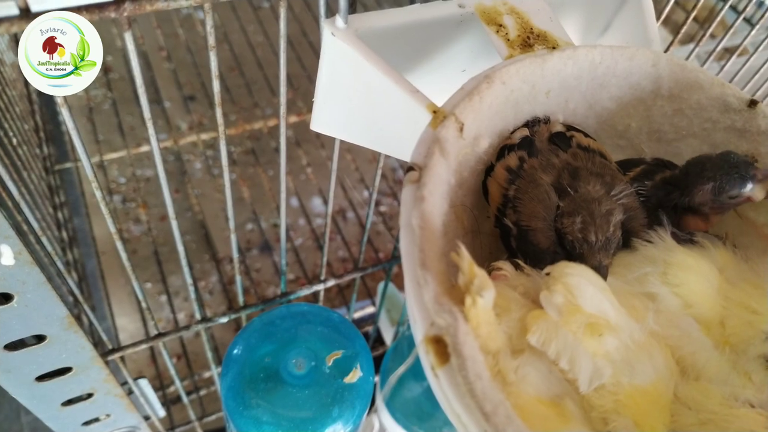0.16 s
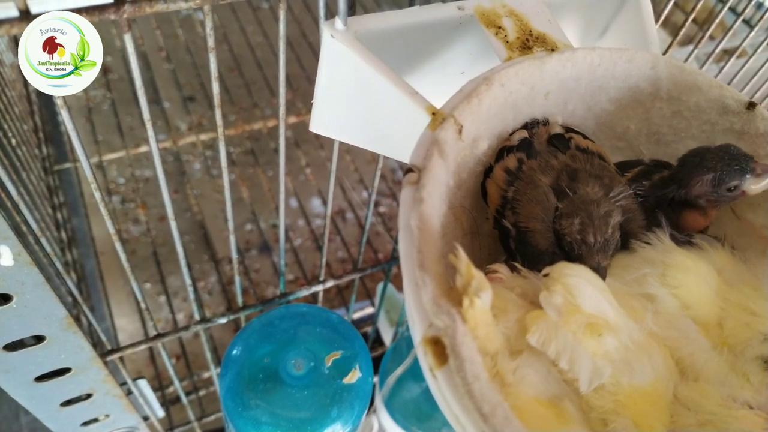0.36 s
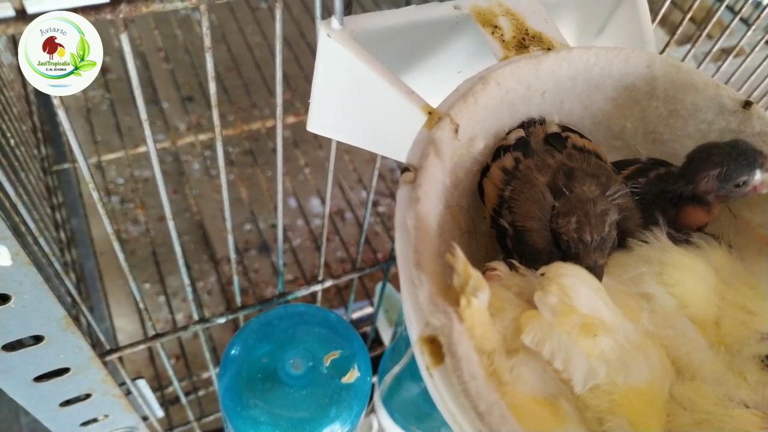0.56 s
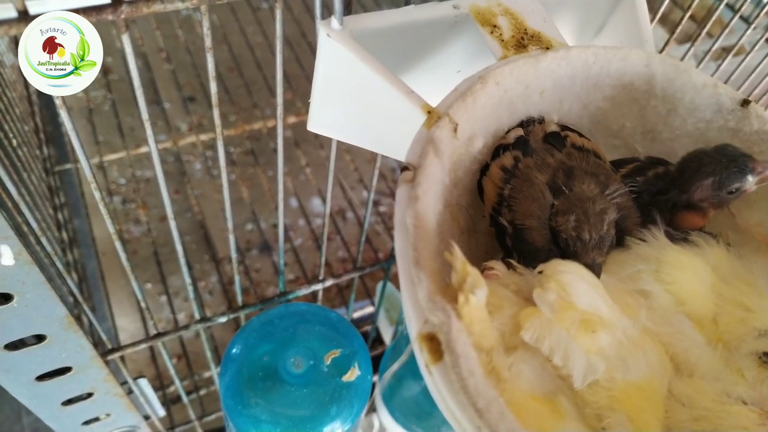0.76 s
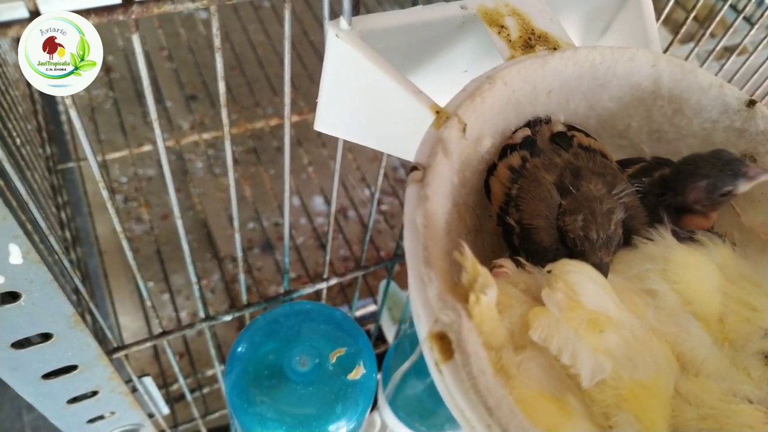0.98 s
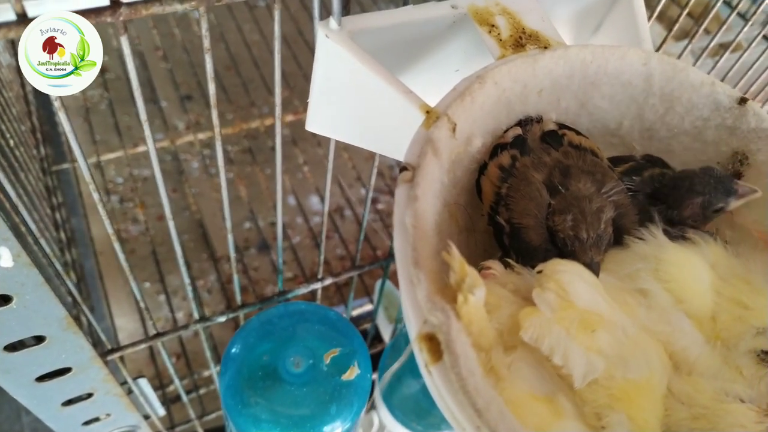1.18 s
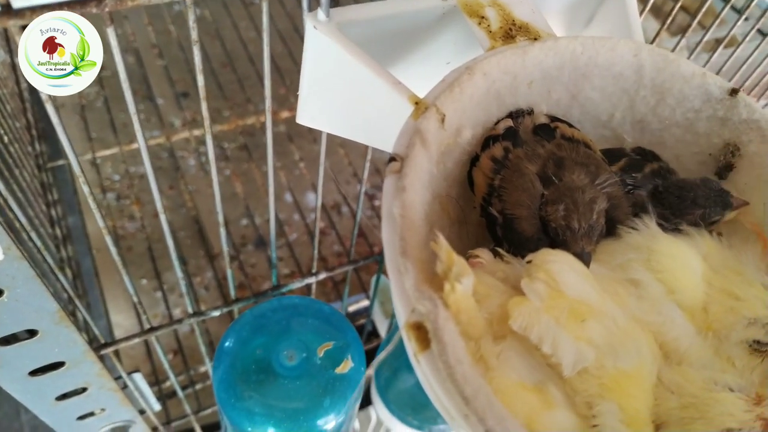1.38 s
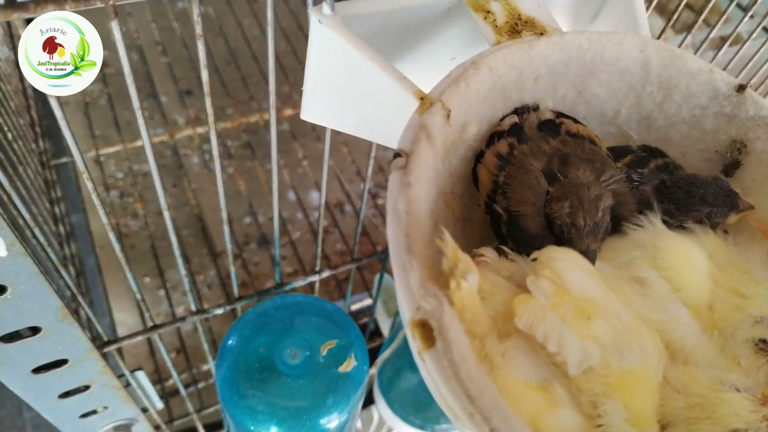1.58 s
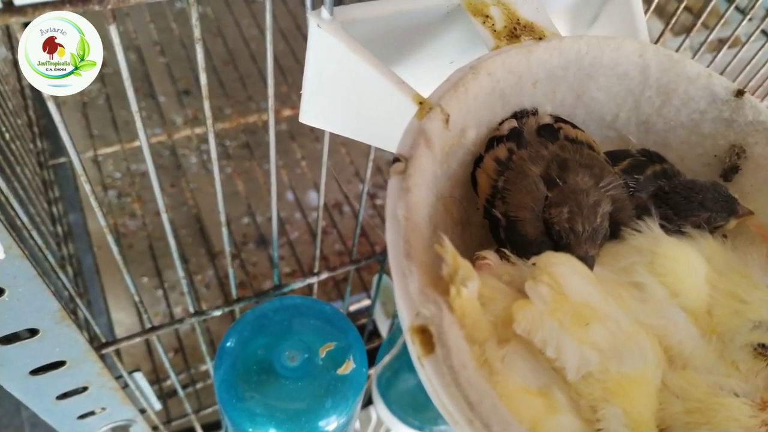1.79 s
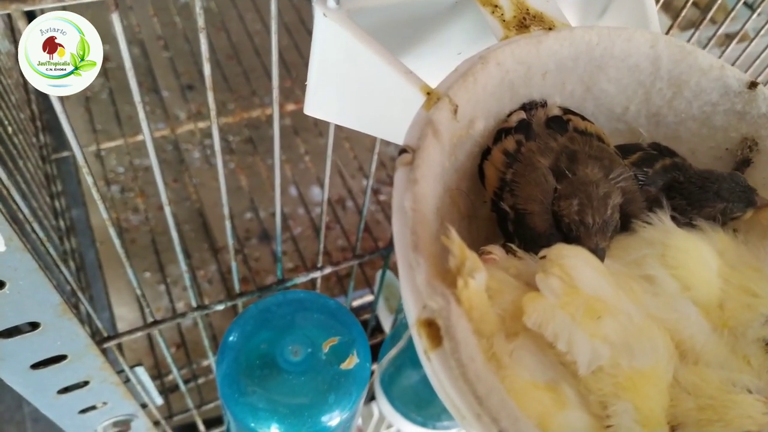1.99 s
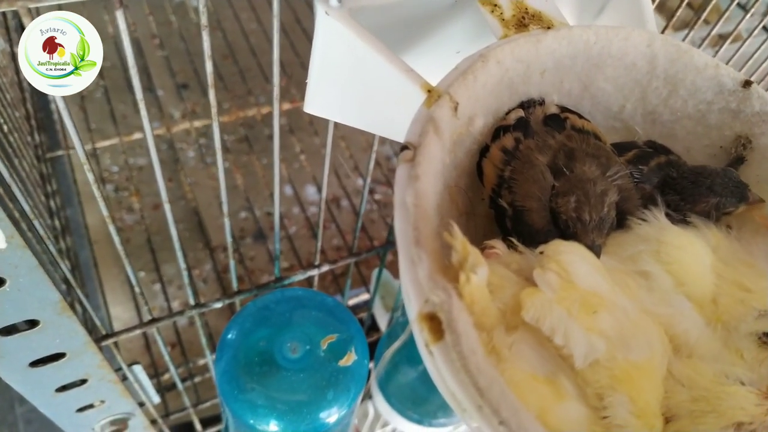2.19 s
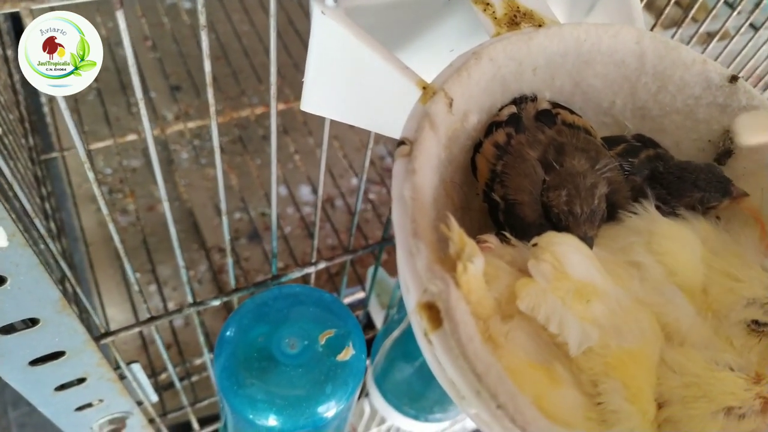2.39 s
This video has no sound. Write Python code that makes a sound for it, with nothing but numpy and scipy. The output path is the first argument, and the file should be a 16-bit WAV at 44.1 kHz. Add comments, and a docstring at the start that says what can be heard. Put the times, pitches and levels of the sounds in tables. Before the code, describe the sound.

Baby birds cheep and whistle in short runs, with soft feather rustling indoors.

```python
"""Nestling birds beg from a nest cup inside a wire cage, in a hard, echoing room.
Two runs of gliding, overlapping whistles each end in a sharp cheep; hoarse calls lie between
and faint chips follow. The syrinx whistles and rattles, and air hisses through open beaks.
Feathers rustle and a beak or claw ticks over a low room rumble; the loudest peaks just clip."""
import sys
import numpy as np
from scipy import signal
from scipy.fft import rfft, irfft
from scipy.io import wavfile
from scipy.ndimage import uniform_filter1d

SR = 44100
rng = np.random.default_rng(int(sys.argv[2]) if len(sys.argv) > 2 else 0)


def dump(signal):
    """Clip the signal to [-1, 1] and save it as 16-bit WAV at the path in sys.argv[1]."""
    limited = np.clip(np.atleast_2d(signal).T, -1, 1)
    pcm = np.round(limited * 32767).astype(np.int16)
    wavfile.write(sys.argv[1], SR, pcm)


N = 108045


def amp(db):
    """Decibels to gain."""
    return 10 ** (np.asarray(db) / 20)


def unit(x):
    """Scales to rms 1."""
    return x / np.sqrt(np.mean(x ** 2) + 1e-20)


def curve(points, hz):
    """Reads a table on a log-frequency axis."""
    f, value = np.transpose(points)
    return np.interp(np.log(hz + 1), np.log(f + 1), value)


def add(mix, start, sound):
    """Mixes a sound in at a start time in seconds."""
    part = mix[max(round(start * SR), 0):][:len(sound)]
    part += sound[:len(part)]


def noise(size, colour):
    """Noise of rms about 1, shaped by the gain colour(hz)."""
    n = 16384 * (1 + size // 16384)
    spectrum = rfft(rng.standard_normal(n)) * colour(np.fft.rfftfreq(n, 1 / SR))
    return unit(irfft(spectrum, n))[:size]


def wobble(size, hz):
    """Smooth random modulation, rolling off above hz."""
    return noise(size, lambda f: np.exp(-.5 * (f / hz) ** 2))


# Room tone EQ: f/Hz, level/dB
ROOM_TONE_EQ = [(15, -4.5), (36, 2), (48, -5.5), (75, -12), (330, -16.5), (700, -24), (1400, -27),
                (4000, -30.5), (8500, -21.5), (14000, -37)]
# Room tone stereo image: f/Hz, left-right correlation/0-1
ROOM_TONE_IMAGE = [(100, .97), (350, 0.95), (1000, 0)]


def room_tone():
    """Low room rumble, nearly mono, under a thin wide hiss."""
    hz = np.fft.rfftfreq(4096, 1 / SR)
    a, b, c, d, patches = rng.standard_normal((N // 1024 + 6, len(hz), 5)).T
    shared = curve(ROOM_TONE_IMAGE, hz)[:, None]
    left = a + 1j * b
    right = shared * left + np.sqrt(1 - shared ** 2) * (c + 1j * d)
    patches = uniform_filter1d(uniform_filter1d(patches, size=30, axis=0), size=5, axis=1)
    eq = amp(curve(ROOM_TONE_EQ, hz)[:, None] + 0.5 * unit(patches))
    bed = signal.istft(np.array([left, right]) * eq, nperseg=4096, noverlap=3072)[1]
    return amp(-37.5) * unit(bed[:, :N])


# Reverb decay: f/Hz, t60/s
REVERB_DECAY = [(2500, 0.48), (6500, 0.4), (14000, 0.28)]


def reverb(x, direct_db=-6, tail_db=-3.5, early_s=0.012):
    """Direct sound, quick reflections off cup and cage, and the room's tail, different on each side."""
    t = np.arange(SR) / SR
    channels = []
    for side in range(2):
        early = rng.standard_normal(SR) * (rng.random(SR) < 1500 / SR) * np.exp(-t / early_s)
        hz, age, spectra = signal.stft(rng.standard_normal(SR), SR, nperseg=256)
        decay = amp(-60 * age / curve(REVERB_DECAY, hz)[:, None])
        tail = signal.istft(spectra * decay, SR, nperseg=256)[1][:SR] * np.minimum(t / early_s, 1)
        impulse = early / np.linalg.norm(early) + amp(tail_db) * tail / np.linalg.norm(tail)
        impulse[side] += amp(direct_db)
        response = rfft(impulse)
        colour = np.sqrt(uniform_filter1d(abs(response) ** 2, size=250))
        neutral = irfft(response / colour)[:SR // 2]
        channels.append(np.linalg.norm(impulse) * signal.fftconvolve(x, neutral)[:N])
    return np.array(channels)


# Feather and nest fibre EQ: f/Hz, level/dB
FEATHER_EQ = [(200, -11), (1100, -3.5), (2300, -0.5), (5500, -2.5), (8500, 12), (11000, 0.5), (14000, -1.5)]


def feather_colour(hz):
    """The dry, bright tone of rubbing feathers, as a gain."""
    return amp(curve(FEATHER_EQ, hz))


# Soft stirring with a lull between: start t/s, end t/s, level/dB
STIR_CUES = [(0, 1.75, -35), (1.9, 2.45, -36)]
GRAIN_DB = 2.5


def stirring(nest):
    """Bodies shift in the nest lining: a soft, uneven crackle of fibres."""
    for start, end, db in STIR_CUES:
        n = round((end - start) * SR)
        swell_db = 8 * wobble(n, hz=4)
        envelope = unit(amp(swell_db + GRAIN_DB * wobble(n, hz=400)))
        add(nest, start, amp(db) * envelope * noise(n, feather_colour))


def burst(length, db, colour, attack_s=0.0027, release_s=0.0049):
    """Grainy noise that rises, holds and dies away."""
    t = np.arange(0, length + 5 * release_s, 1 / SR)
    envelope = np.minimum(t / attack_s, 1) * np.exp(-np.maximum(t - length, 0) / release_s)
    return amp(db) * envelope * noise(len(t), colour) * unit(amp(GRAIN_DB * wobble(len(t), hz=305)))


# Rustle accents: t/s, length/s, level/dB
RUSTLE_CUES = [(1.435, 0.12, -30), (1.483, 0.021, -24), (1.661, 0.054, -28.5), (2.109, 0.02, -26),
               (2.222, 0.037, -27.5), (2.365, 0.014, -25.5)]


def rustles(nest):
    """Feathers and nest fibres rub in short bursts."""
    for start, length, db in RUSTLE_CUES:
        add(nest, start, burst(length, db, feather_colour))


# Beak and claw ticks: t/s, level/dB, f/Hz, ring/s, reverb send/gain
TICK_CUES = [(1.295, -30, 1800, 0.00048, 0.21), (2.2756, -10, 6300, 0.00017, 0.29)]


def ticks(nest, close):
    """Tiny hard contacts with a short ring, close and nearly dry."""
    for start, db, hz, ring_s, send in TICK_CUES:
        t = np.arange(0, 10 * ring_s, 1 / SR)
        tick = amp(db) * t / ring_s * np.exp(1 - t / ring_s) * np.sin(2 * np.pi * hz * t)
        add(close, start, tick)
        add(nest, start, send * tick)


# Voiceless calls: t/s, length/s, level/dB, centre f/Hz, half width/octaves
HISS_CUES = [(0.048, 0.027, -28.5, 8040, 0.62), (0.172, 0.1, -30.5, 8860, 0.11),
             (0.549, 0.16, -26.5, 6100, 0.77), (0.737, 0.078, -17.5, 7300, 0.8),
             (0.823, 0.15, -29.5, 7600, 1), (0.931, 0.083, -26.5, 8750, 0.1),
             (1.858, 0.038, -26.5, 6440, 0.4), (2.02, 0.0098, -25.5, 7300, 0.4),
             (2.148, 0.046, -27.5, 7200, 0.75)]
LOW_CUT_HZ = 2020  # the small throat passes little below this


def hisses(nest):
    """Air through an open beak: one broad resonance, nothing below the voice."""
    for start, length, db, centre_hz, octaves in HISS_CUES:
        def beak(f):
            resonance = 1 / (1 + (np.log2((f + 1) / centre_hz) / octaves) ** 2)
            return resonance / (1 + (LOW_CUT_HZ / (f + 1)) ** 20) / (1 + (f / 11500) ** 10)
        add(nest, start, burst(length, db, beak))


# Throat and open beak EQ, applied on top of each whistle's level: f/Hz, level/dB
THROAT_EQ = [(2200, -9), (3500, -8), (5000, -4.5), (7400, -2.5), (8800, -2.5), (11000, -11), (12500, -14.5)]
JITTER_HZ, JITTER_DEPTH, FLUTTER_DEPTH = 505, 0.0636, 0.4  # random pitch and level at full roughness
RATTLE_HZ, RATTLE_VIBRATO, RATTLE_TREMOLO = 135.6, 0.095, 0.33  # the pulse of a hoarse call


def whistle(rough, overtones_db, glide, fade_s=0.0017):
    """One side of the syrinx whistles a jittering glide that rattles when hoarse; the throat colours it."""
    times, pitches, levels = np.transpose(glide)
    t = np.arange(times[0], times[-1] + fade_s, 1 / SR)
    n, hoarse = len(t), rough ** 2
    hz, level = np.interp(t, times, pitches), np.interp(t, times, levels)
    rattle = 2 * np.pi * np.cumsum(RATTLE_HZ * (1 + 0.253 * wobble(n, hz=59.3))) / SR
    jitter = JITTER_DEPTH * rough * wobble(n, JITTER_HZ)
    vibrato = RATTLE_VIBRATO * hoarse * np.sin(rattle)
    phase = 2 * np.pi * np.cumsum(hz * (1 + jitter + vibrato)) / SR
    tone = 0
    for k, db in enumerate([0, *overtones_db], 1):
        rasp = hoarse * (wobble(n, hz=1000) + 1j * wobble(n, hz=1000))
        # Air fringes even a clear whistle, more so on the overtones.
        breath = amp(-19 if k == 1 else -13) * (wobble(n, hz=520) + 1j * wobble(n, hz=520))
        tilt_db = 0.085 * (k - 3) * (level - level.max())  # duller as the effort slackens
        gain = amp(db + curve(THROAT_EQ, k * hz) + tilt_db)
        tone = tone + gain * ((1 + rasp + breath) * np.exp(1j * k * phase)).real
    gate = np.clip(np.minimum(t - t[0], t[-1] - t) / fade_s, 0, 1)
    flutter = FLUTTER_DEPTH * rough * wobble(n, JITTER_HZ)
    tremolo = RATTLE_TREMOLO * hoarse * np.cos(rattle)
    envelope = gate * unit(np.exp(flutter + tremolo)) * amp(level)
    low_cut = signal.butter(10, LOW_CUT_HZ, "high", fs=SR, output="sos")
    return signal.sosfilt(low_cut, np.sqrt(2) * tone * envelope)


# Short peeps: t/s, length/s, f/Hz, level/dB, roughness/0-1
PEEP_CUES = [(0, 0.0087, 7060, -16.5, 0), (0.084, 0.011, 7280, -12.5, 0.14), (0.148, 0.024, 6630, -28, 0.3),
             (0.993, 0.023, 5360, -18, 0.5), (1.857, 0.064, 5524, -22, 0.37), (2.027, 0.1, 5360, -21, 0.33),
             (2.027, 0.047, 7790, -18, 0.28), (2.152, 0.06, 6820, -15, 0.22),
             (2.152, 0.09, 4890, -28.5, 0.42)]


def peeps(nest, attack_s=0.0045, edge_db=-18, sag=0.018):
    """Brief whistles that swell and fade while their pitch sags a little."""
    for start, length, hz, db, rough in PEEP_CUES:
        glide = [(start, hz * (1 + sag), db + edge_db),
                 (start + min(attack_s, length / 2), hz, db),
                 (start + length, hz * (1 - sag / 2), db + edge_db)]
        add(nest, start, whistle(rough, [], glide))


# Begging calls: roughness/0-1, [level/dB of harmonics 2, 3...], glide [(t/s, f/Hz, level/dB)...]
BEGGING_CUES = [ (0.26, [-14.5], [(.148, 1910, -31), (.19, 2510, -15), (.25, 3040, -32)]), (0.094, [-8.5],
                [(.188, 4965, -48), (.208, 5536, -6), (.228, 5840, -29)]), (0.14, [7.8, -0.81],
                [(.252, 3202, -32), (.266, 3313, -13), (.28, 3423, -17.5), (.308, 3407, -29)]),
                (0.32, [-7.5], [(.206, 6600, -20), (.228, 4644, -12), (.243, 4164, -14.5),
                (.285, 3115, -10.5)]), (0.39, [-10.5], [(.285, 2877, -14), (.305, 2525, -12.5),
                (.385, 2091, -24), (.45, 1658, -20.5)]), (0.1, [-7.5], [(.287, 4657, -6),
                (.298, 4756, -9.5), (.348, 4956, -9.5), (.378, 5510, -3), (.425, 5667, -14)]), (0.233, [],
                [(.422, 8080, -18), (.431, 6870, 0.5), (.447, 7460, -5.5), (.485, 7770, -32.5)]),
                (0.28, [2.3, -3.5, -3.8], [(.574, 1977, -16.5), (.601, 2440, -21.5), (.655, 2506, -22.5)]),
                (0.35, [], [(.739, 7900, -11), (.79, 6054, -21), (.835, 5440, -20.5)]),
                (0.68, [-13.5, -25, -19], [(.745, 2584, -27.5), (.87, 2375, -20.5), (.965, 2368, -19),
                (1.03, 2448, -16.5)]), (0.31, [], [(.75, 2054, -38.5), (.9, 2057, -23.5),
                (1.02, 2085, -17.5)]), (0.13, [8, 0.5], [(1.03, 3121, -38), (1.05, 3441, -19),
                (1.085, 3590, -35), (1.112, 3617, -12.5), (1.165, 3467, -37.5)]), (0.171, [-8],
                [(1.03, 2730, -26), (1.06, 3464, -15.5), (1.109, 4610, -22.5), (1.119, 5155, -2.5),
                (1.143, 5500, -13.5), (1.18, 5702, -14.5)]), (0.225, [-14.5], [(1.2, 8310, -32),
                (1.207, 6870, 1.5), (1.217, 7020, -10.5), (1.232, 8150, -24)]), (0.65, [],
                [(1.858, 3480, -30), (1.872, 3606, -22.5), (1.91, 4140, -28), (1.922, 3910, -39)]), ]


def begging(nest):
    """The chicks' overlapping whistles, sharp cheeps and hoarse calls."""
    for rough, overtones_db, glide in BEGGING_CUES:
        start = glide[0][0]
        add(nest, start, whistle(rough, overtones_db, glide))


def scene():
    """Chicks and nest play through the reverb, with close ticks in front and room tone behind."""
    nest, close = np.zeros(N), np.zeros(N)
    begging(nest)
    peeps(nest)
    hisses(nest)
    rustles(nest)
    ticks(nest, close)
    stirring(nest)
    return reverb(nest) + close + room_tone()


def record(dry):
    """The loudest peaks are hard-clipped; a steep high cut follows."""
    clipped = np.clip(dry, -1, 1)
    high_cut = signal.firwin(511, 14400, window=("kaiser", 9), fs=SR)
    return signal.oaconvolve(clipped, high_cut[None], "same", axes=1)


dry = scene()
out = record(dry)
dump(out)
```